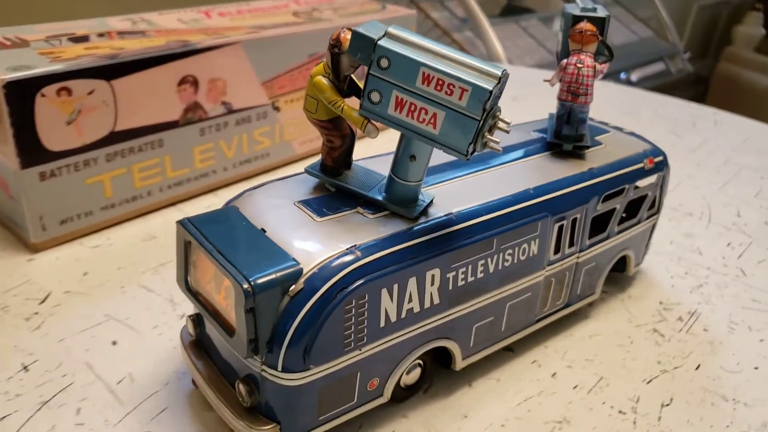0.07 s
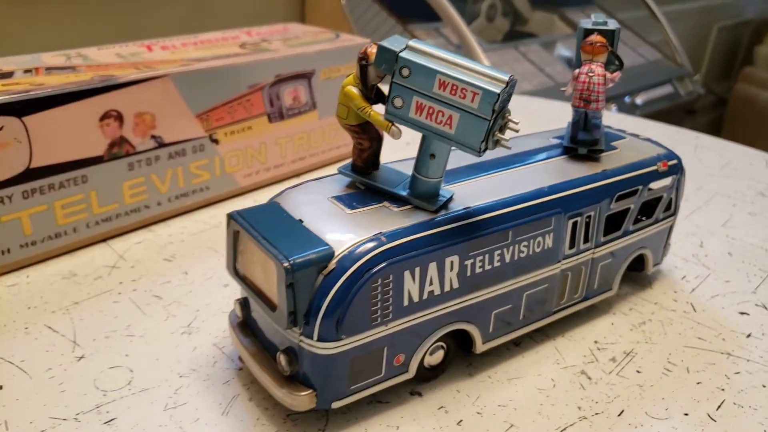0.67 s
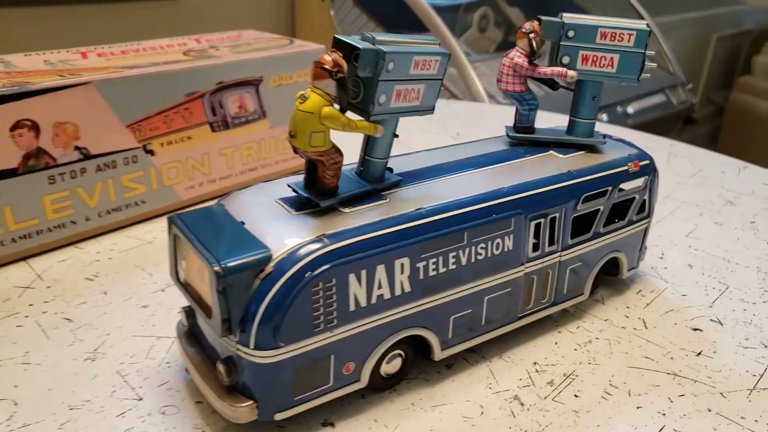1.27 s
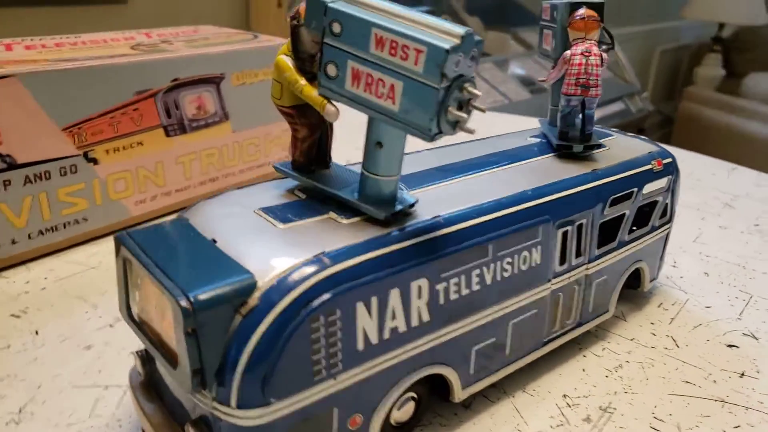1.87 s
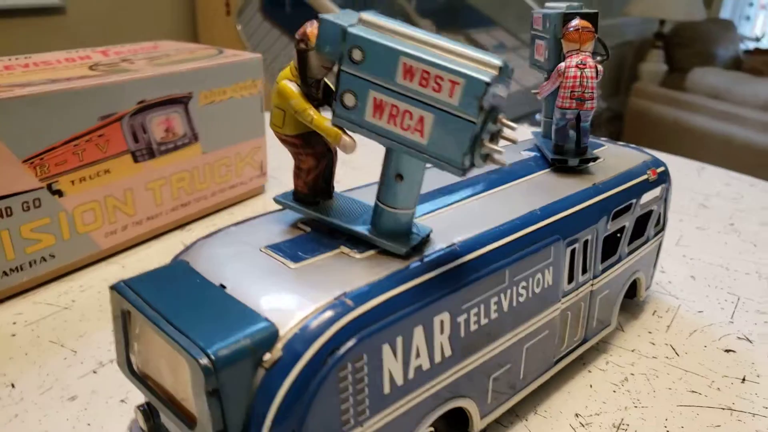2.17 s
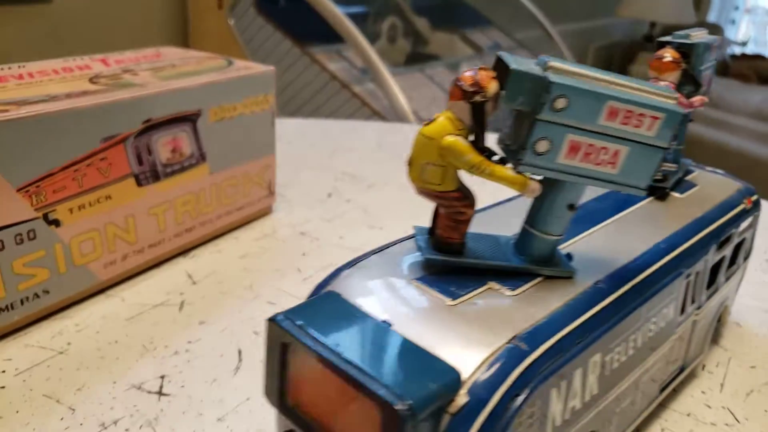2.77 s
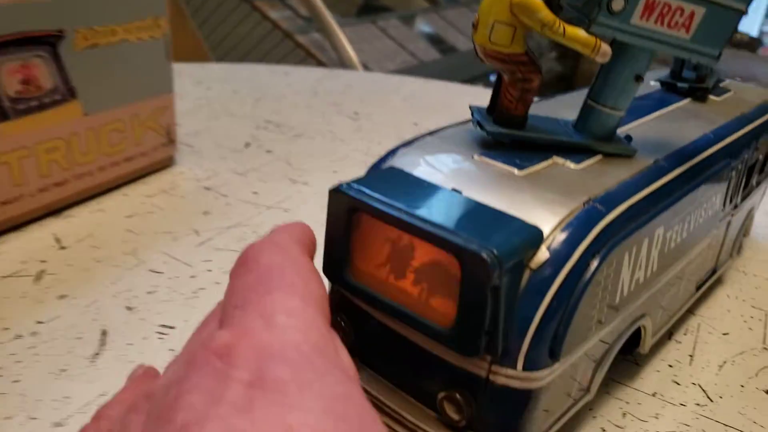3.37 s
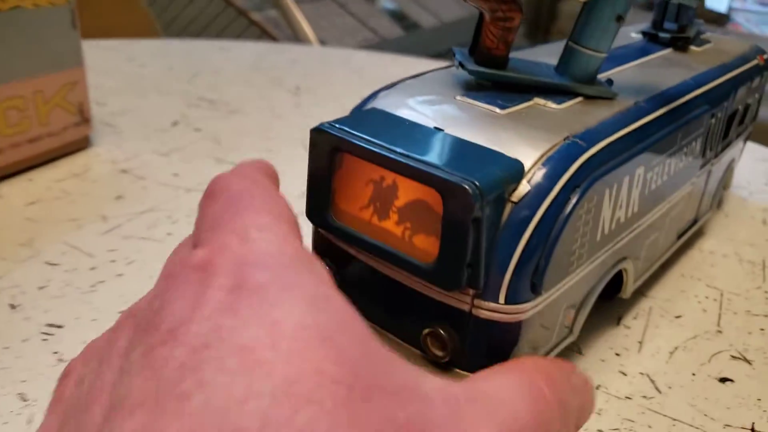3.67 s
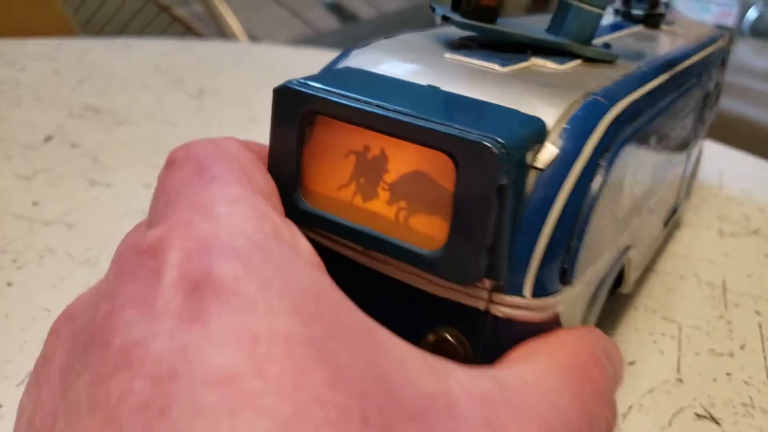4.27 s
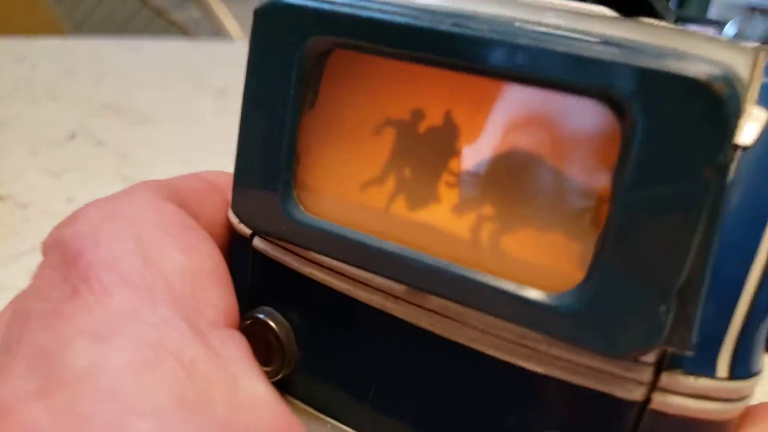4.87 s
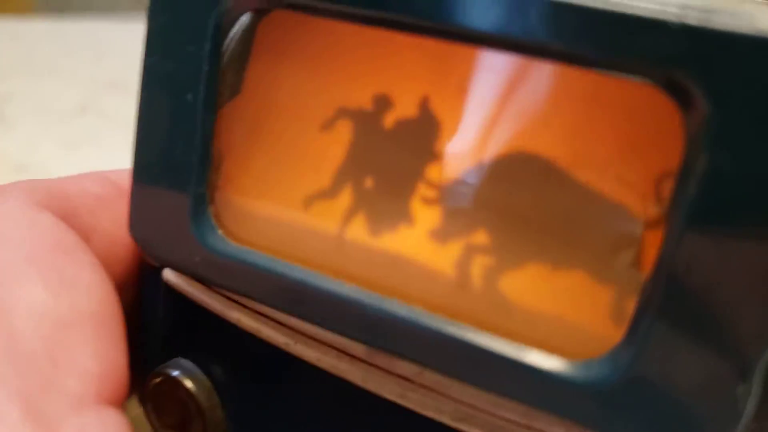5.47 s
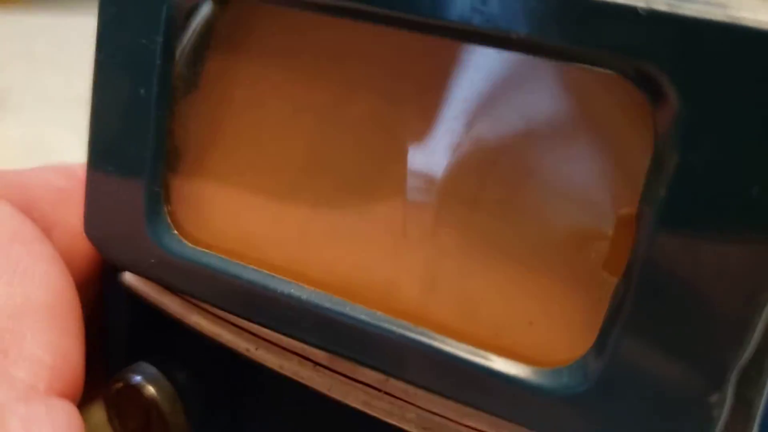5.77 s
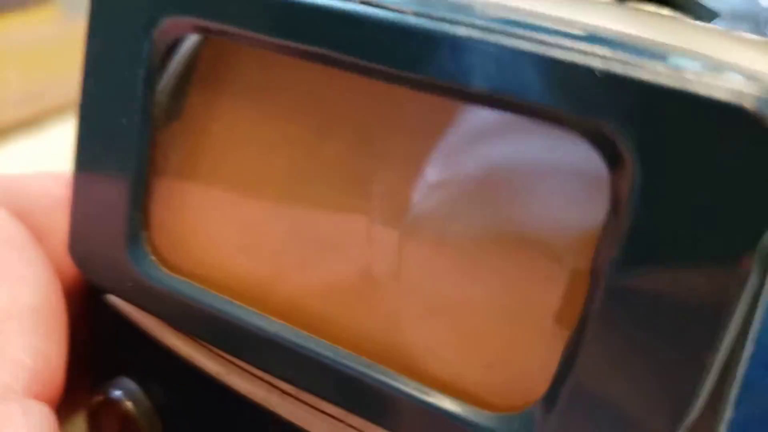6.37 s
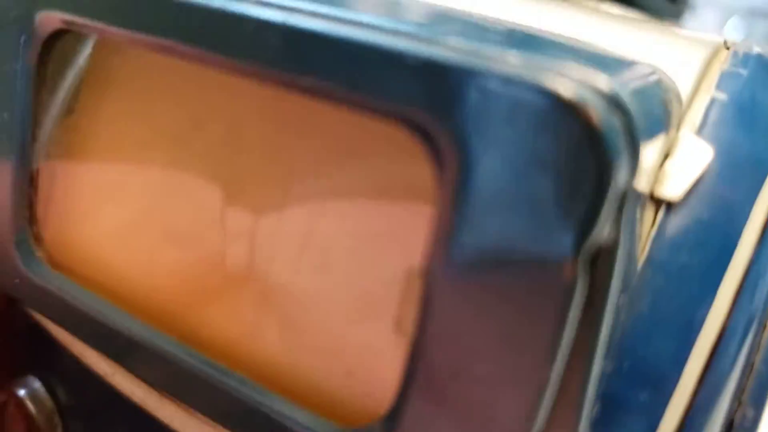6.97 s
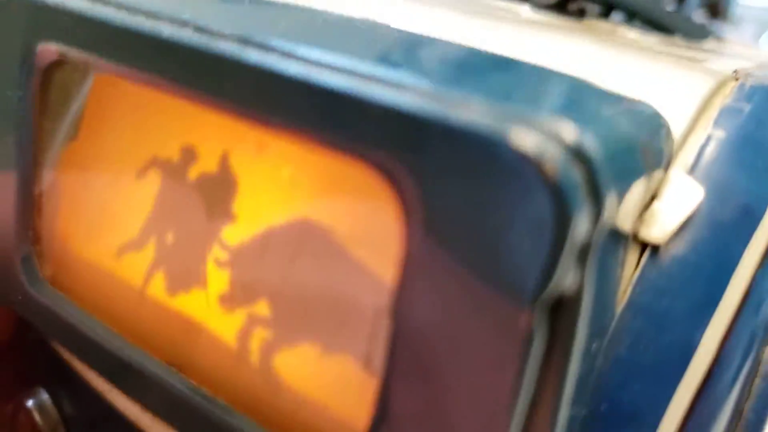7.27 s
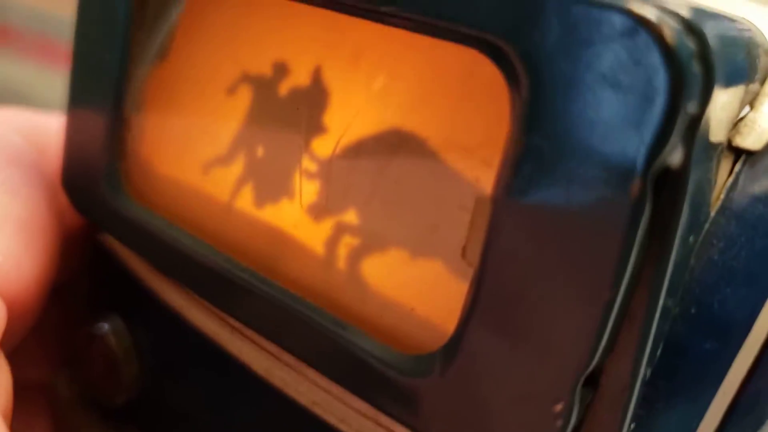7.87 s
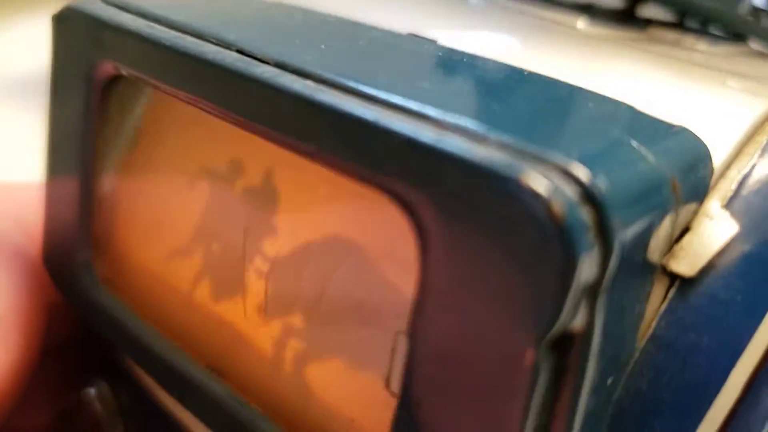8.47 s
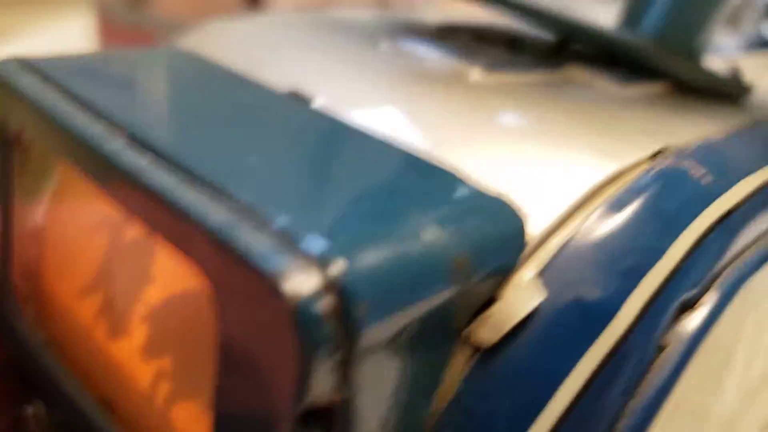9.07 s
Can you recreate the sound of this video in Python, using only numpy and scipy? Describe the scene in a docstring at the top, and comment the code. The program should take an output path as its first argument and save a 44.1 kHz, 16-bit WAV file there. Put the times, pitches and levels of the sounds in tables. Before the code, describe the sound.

A battery-powered tin toy truck whirs on a table in a small room, its motor and loose gears making a dense, bright metallic rattle for the whole nine seconds. The gears take up a load from about 1 to 2.3 seconds, 4.7 to 6.2, and again from 8.6: the motor sags slightly, the rattle throbs and the panels ring. Underneath, the wheels drum on the table, with dull knocks around 1.7 and 2.5 seconds, easing when a hand takes hold just after 4. The microphone moves from the side to close in front by 5 seconds, and the rattle grows slightly louder. Loose parts clack near 2, 2.5, 5, 6, 7.5, 8 and 9 seconds. A tiny, very high bearing squeak comes just before 6. Thin whistles come and go from then until 8.7, and the toy slides with a soft judder from 6.2 to 7.7.

```python
"""A whirring tin rattle: a toy truck's battery motor turns loose gears that shake its sheet-metal body.
Every few seconds the gears run slack, then take up a load: the motor sags, the rattle throbs, panels sing.
The wheels drum on a table until a hand takes hold, then slides the toy.
Loose parts clack, thin high whistles come and go, a dry bearing squeaks.
A stereo microphone moves from beside the truck to close in front, in a small room."""
import sys
import numpy as np
from scipy import signal
from scipy.fft import rfft, irfft, next_fast_len
from scipy.io import wavfile
from scipy.ndimage import uniform_filter1d

SR = 44100
rng = np.random.default_rng(int(sys.argv[2]) if len(sys.argv) > 2 else 0)


def dump(signal):
    """Clip the signal to [-1, 1] and save it as 16-bit WAV at the path in sys.argv[1]."""
    limited = np.clip(np.atleast_2d(signal).T, -1, 1)
    pcm = np.round(limited * 32767).astype(np.int16)
    wavfile.write(sys.argv[1], SR, pcm)


N = 406602
TIME = np.arange(N) / SR
FFT_SIZE = next_fast_len(N, True)
FREQS = np.fft.rfftfreq(FFT_SIZE, 1 / SR)


def amp(db):
    return 10 ** (np.asarray(db) / 20)


def unit_rms(x):
    return x / np.sqrt(np.mean(x ** 2) + 1e-20)


def over_time(rows, column=1):
    """Time-table column at every sample."""
    rows = np.array(rows)
    return np.interp(TIME, rows[:, 0], rows[:, column])


def over_hz(rows, hz, column=1):
    """Spectrum-table column, interpolated in log frequency."""
    rows = np.array(rows)
    return np.interp(np.log(hz + 1), np.log(rows[:, 0] + 1), rows[:, column])


def colour(x, gain):
    """Filter by a gain given at FREQS."""
    return irfft(rfft(x, FFT_SIZE) * gain, FFT_SIZE)[..., :N]


def bell(hz, width_hz):
    """Response of one resonance."""
    return 1 / (1 + (2 * (FREQS - hz) / width_hz) ** 2)


def wander(rate_hz):
    """Low-passed noise, rms 1."""
    return unit_rms(colour(rng.standard_normal(N), bell(0, 2 * rate_hz)))


def ramp(at_s, edge_s):
    """Rise from 0 to 1, centred on at_s."""
    return np.clip((TIME - at_s) / edge_s + .5, 0, 1)


def arch(start_s, end_s):
    """Sample span, progress through it, and a rounded swell."""
    span = slice(*np.searchsorted(TIME, [start_s, end_s]))
    progress = (TIME[span] - start_s) / (end_s - start_s)
    return span, progress, np.sqrt(abs(np.sin(np.pi * progress)))


def balance(left_minus_right_db):
    return amp(np.array([[.5], [-.5]]) * left_minus_right_db)


def add(mix, at_s, sound):
    part = mix[..., round(at_s * SR):][..., :sound.shape[-1]]
    part += sound[..., :part.shape[-1]]


def resonate(x, hz, width_hz):
    """Unity-gain resonance following the curve hz."""
    phasor = np.exp(2j * np.pi * np.cumsum(hz) / SR)
    pole = np.exp(-np.pi * width_hz / SR)
    return 2 * (phasor * signal.lfilter([1 - pole], [1, -pole], x / phasor)).real


# Spells under load (start [s], end [s], slack before [s], lift [dB], throb [Hz])
LOAD_SPELLS = [(.96, 2.25, .18, 2, 8.6), (4.719, 6.2, 0.89, 2, 7.4), (8.6, 9.4, 0.4, 1, 7.25)]
# Gears catching (middle [s], length [s], lift [dB])
GEAR_CATCHES = [(0.472, 0.055, 1.5), (0.614, 0.25, 1.8), (0.99, 0.055, 0), (1.2, 0.073, 1.5),
                (1.615, 0.16, 1.5), (1.82, 0.25, 1.8), (2.105, 0.35, 0.5), (2.516, 0.13, 3),
                (2.88, 0.088, 1.6), (3.436, 0.087, 2), (3.582, 0.15, 2.5), (5.264, 0.12, 1.5),
                (5.56, 0.27, 2.5), (5.89, 0.34, 0.3), (6.28, 0.051, 4), (8.681, 0.068, 1.5)]


def gear_load(engage_s=.05, first_crest_s=.12, throb_db=.86, free_throb_db=.19, free_throb_hz=7.6):
    """Gears slacken, engage and catch: load and slack (0 to 1), and the rattle's lift."""
    load, slack, effort_db = np.zeros((3, N))
    for start, end, slack_s, lift_db, throb_hz in LOAD_SPELLS:
        engaged = ramp(start, engage_s) - ramp(end, engage_s)
        throb = np.cos(2 * np.pi * throb_hz * (TIME - start - first_crest_s))
        load += engaged
        slack += ramp(start - slack_s, engage_s) - ramp(start, engage_s)
        effort_db += engaged * (lift_db + throb_db * throb)
    effort_db += (1 - load) * free_throb_db * np.cos(2 * np.pi * free_throb_hz * (TIME - 6.5))
    for middle_s, length_s, lift_db in GEAR_CATCHES:
        effort_db += lift_db * np.cos(np.pi * np.clip((TIME - middle_s) / length_s, -.5, .5))
    return load, slack, effort_db


def tin_ring(ring_t60_s=.023, room_t60_s=.31, room_db=-21):
    """Two paths from one contact: dense sheet-metal ring, then the room; spectrum flattened."""
    t = np.arange(SR // 5) / SR
    decay = amp(-60 * t / ring_t60_s) + amp(room_db - 60 * t / room_t60_s)
    spectrum = rfft(rng.standard_normal((2, len(t))) * decay)
    return irfft(spectrum / np.sqrt(uniform_filter1d(abs(spectrum) ** 2, size=24, axis=1)))


def gears(turns, contacts=5, teeth=12, uneven_db=5.2, flutter_db=2, timbre_db=9, creep_hz=.9):
    """Teeth strike early or late at loose contacts, each creeping between two ringing spots."""
    out, clumps_db = np.zeros((2, N)), -.06 * wander(30)
    # Contacts share out the spectrum and, in slowly shifting parts, the load.
    ripple = FREQS / rng.uniform(1660, 8200, (contacts, 1)) + rng.random((contacts, 1))
    timbres = amp(timbre_db * np.sin(2 * np.pi * ripple))
    timbres /= np.linalg.norm(timbres, axis=0)
    shares = amp(1.07 * np.array([wander(2.8) for _ in range(contacts)]))
    shares /= np.linalg.norm(shares, axis=0)
    for k in range(contacts):
        teeth_passed = teeth * turns / (1 + k / 3) + .25 * wander(500)
        strikes = np.diff(np.floor(teeth_passed), prepend=0) > 0
        eccentric_db = .85 * np.sin(2 * np.pi * (turns / (1 + k) + rng.random()))
        force_db = uneven_db * np.minimum(rng.standard_normal(N), 2) + flutter_db * wander(40)
        blows = unit_rms(strikes * amp(force_db + eccentric_db + clumps_db)) * shares[k]
        chance = rng.uniform(-1, 1, N)
        creep = np.sin(2 * np.pi * (creep_hz * (.5 + rng.random()) * TIME + rng.random()))
        for spot in chance < creep, chance >= creep:
            out += signal.oaconvolve(colour(blows * spot, timbres[k])[None], tin_ring(), axes=1)[:, :N]
    return unit_rms(out)


def motor_buzz(turns, drift_db=3):
    """The same roughness passes every shaft turn: a wavering stack of harmonics."""
    grid, orders = np.linspace(0, 1, 2048), np.arange(7, 108)[:, None]
    shapes = [np.cos(2 * np.pi * (orders * grid + rng.random(orders.shape))).sum(0) for _ in range(2)]
    buzz = [np.interp(turns % 1, grid, shape) * amp(drift_db * wander(2.6)) for shape in shapes]
    return unit_rms(np.array(buzz))


# Left-right likeness (frequency [Hz], correlation [-1 to 1])
MIC_CORRELATION = [(100, 0.72), (700, 0.84), (1200, 0.79), (2000, 0.086), (3500, 0.011), (15000, 0.016)]


def mic_pair(x, lag_s=.0001):
    """Two unrelated signals blend at the microphone ports; the right one lags."""
    angle = np.arccos(np.clip(over_hz(MIC_CORRELATION, FREQS), -1, 1)) / 2
    mid, side = colour(x[0], np.cos(angle)), colour(x[1], np.sin(angle))
    return np.array([mid + side, colour(mid - side, np.exp(-2j * np.pi * FREQS * lag_s))])


def table_echo(x, echo_db=-11, delay_s=.0019, drift_s=.00009):
    """The table mirrors the treble; the notches slide as the hand-held microphone drifts."""
    treble = colour(x, 1 - bell(0, 7900))
    paths = [np.interp(TIME - delay_s - drift_s * colour(wander(.49), bell(0, 2.6)), TIME, port)
             for port in treble]
    return (x + amp(echo_db) * np.array(paths)) / np.sqrt(1 + amp(echo_db) ** 2)


# Microphone path (time [s], position [0 side, 1 front])
MIC_PATH = [(0, 0.32), (3.3, 0.32), (4.4, 0.57), (4.9, 0.88), (6.3, 0.93), (9.2, 0.79)]
# Microphone sway (time [s], left minus right [dB])
MIC_SWAY = [(0, -4), (2.7, -2.5), (3.4, -4), (4.7, -1.2), (6.7, 0), (8.2, -2.5), (9.2, 0)]
# Broad body radiation (frequency [Hz], side [dB], front [dB])
RADIATION = [(60, -55, -73), (386, -19, -11), (584, -14.5, -15.5), (823, -25.5, -12.5), (890, -3.5, -11.5),
             (1600, -12, -6.5), (2380, -4.5, -3), (3380, -1.5, 1), (5300, -4, -1.5), (6520, -4, -6),
             (10080, -11, -12), (11520, -3.5, -5.5), (14100, -4, -6), (15500, -4, -1)]
# Panel resonances and gaps (frequency [Hz], width [Hz], side lift [dB], front lift [dB])
PANEL_MODES = [(708, 120, 19.5, 3), (978, 69, 8, 5), (1120, 38, 10.5, 1), (1260, 89, 11.5, 4),
               (1397, 107, 6, 5.5), (1470, 66, 7, 3.5), (1620, 120, 8, 0.5), (1923, 160, 10, 5.5),
               (2180, 220, 3.5, -2.5), (2390, 110, 6, -1.5), (2604, 190, 2.5, 3), (2780, 120, -3, -0.5),
               (3070, 73, 3, 5), (3330, 94, 5, -5), (3460, 120, 0, 2.5), (4050, 280, 0.5, -1.5),
               (4760, 200, 1, 4), (5110, 120, -2, 6.5), (5650, 300, -1, 1.5), (6100, 220, -0.5, -1),
               (6340, 230, 1.5, 1), (6770, 280, 4, -2.5), (7500, 130, 5, -0.5), (7600, 2200, -6.5, -0.5),
               (7960, 190, 5, 6), (8270, 740, 4.5, 3), (8900, 300, -6, 3), (9280, 220, 3, 1),
               (10790, 200, 0, 5), (10950, 210, 6.5, 7.5), (12100, 420, 0, 3), (15500, 300, 4, -3)]
# Body's left minus right (frequency [Hz], side [dB], front [dB])
BODY_BALANCE = [(503, 11, 3), (805, 5, -5), (1280, 8, -5.5), (1425, 8, 6), (1920, -2.5, 9),
                (2390, 7.5, 3.5), (2900, 5, 10.5), (4200, 2, 0.5), (5270, 3.5, 6), (5800, 7, -1),
                (7340, 11, 16.5), (8200, 5, -2), (12500, 4.5, 2), (15500, 6, -4)]
# Ring, clatter, rasp, sizzle, fizz
# (upper edge [Hz], side gain [dB], front gain [dB], load change [dB], slack change [dB])
BODY_BANDS = [(2285, -10.5, -10, -1.1, -0.84), (5340, -8.5, -9, 1, -1.26), (7380, -11, -17.5, 1, -3.5),
              (12440, -6, -5, -0.95, -0.64), (20200, -7.5, -5, 1.3, 0.5)]


def tin_body(drive, load, slack, front, shiver_db=.78):
    """Panels colour the rattle by listening angle; load and slack shift the tone."""
    out = np.zeros((2, N))
    lowpasses = [1 / (1 + (FREQS / edge_hz) ** 12) for edge_hz, *_ in BODY_BANDS]
    bands = np.diff(lowpasses, axis=0, prepend=0)
    for view, share in enumerate([1 - front, front]):
        panels_db = sum(lift_db[view] * bell(hz, width) for hz, width, *lift_db in PANEL_MODES)
        shell_db = over_hz(RADIATION, FREQS, view + 1)
        gain = amp(shell_db + panels_db) * balance(over_hz(BODY_BALANCE, FREQS, view + 1))
        for band, (_, *view_db, load_db, slack_db) in zip(bands, BODY_BANDS):
            tone_db = view_db[view] + load_db * load + slack_db * slack + shiver_db * wander(19)
            out += share * unit_rms(colour(drive, gain * band)) * amp(tone_db)
    return swelling_bands(shimmer(out), load, front) * balance(over_time(MIC_SWAY))


# Narrow-mode fluctuation (frequency [Hz], rms depth [dB])
SHIMMER_DEPTH = [(900, 0.8), (2600, 2.3), (9000, 2.6), (12000, 2)]


def shimmer(x):
    """Countless narrow modes of thin tin come and go."""
    hz, _, spectra = signal.stft(x, SR, nperseg=2048)
    modes = rng.standard_normal(spectra.shape)
    for _ in range(2):
        modes = uniform_filter1d(uniform_filter1d(modes, size=3, axis=1), size=8, axis=2)
    depth_db = over_hz(SHIMMER_DEPTH, hz)[:, None]
    excess_power_db = depth_db ** 2 * np.log(10) / 20
    return signal.istft(spectra * amp(depth_db * unit_rms(modes) - excess_power_db), SR)[1][:, :N]


# Panels under load (frequency [Hz], width [Hz], side lift [dB], front lift [dB])
STRAINED_MODES = [(935, 120, 6.5, 0), (1090, 77, 0.5, 3.5), (1710, 100, 4, 2), (3140, 100, 5.5, -2),
                  (3600, 240, 2.5, -0.5), (4380, 270, 0.5, 2)]
# Passing bands (start [s], end [s], from [Hz], to [Hz], width [Hz], left lift [dB], right lift [dB])
GLIDING_BANDS = [(0, .8, 10980, 11030, 130, 7, 3), (0, .6, 3200, 3130, 90, 3, 8),
                 (.45, 0.86, 6900, 6800, 300, 6, 2), (.97, 1.2, 3135, 3100, 60, 6, 7.5),
                 (1, 1.5, 3300, 3310, 50, 7, 6), (1.05, 1.32, 995, 985, 70, 6, 8),
                 (1.5, 2.4, 11100, 11200, 200, 6, 6), (1.7, 2.1, 3290, 3360, 60, 6, 6),
                 (2.6, 3.4, 6850, 6700, 300, 6.5, 0), (3.4, 3.5, 6800, 6650, 300, 6, 5),
                 (3.1, 4.7, 1240, 1290, 200, 3.5, 2.5), (4.4, 7.3, 1100, 1150, 110, 9.5, 7),
                 (6.3, 9.8, 1905, 1968, 60, 6, 6.5), (4.6, 5.9, 3470, 3470, 80, 5, 1.5),
                 (4.7, 5.3, 10950, 10920, 220, 6, 6), (4.8, 5.3, 5180, 5220, 80, 4, -2),
                 (5.2, 5.5, 1060, 1027, 87, 5.5, 5.5), (5.3, 6.1, 4700, 4600, 100, 2, 1),
                 (5.47, 5.8, 1390, 1400, 1107, 1.5, 4), (5.4, 6, 7550, 7850, 260, 6, -6),
                 (5.65, 6.2, 10900, 10720, 250, 6, 3), (6.25, 6.6, 8930, 8800, 130, -1, 7),
                 (6.8, 7.6, 8740, 8450, 99, 3, 6), (7.1, 7, 975, 970, 90, 5, 7),
                 (7.9, 8, 8200, 8400, 201, 2, 10), (7.3, 9.2, 15350, 15550, 300, 1.5, 6),
                 (7, 11, 780, 780, 160, 5, 5), (8.499, 9.7, 2665, 2676, 100, 6, 8),
                 (8.62, 9.4, 970, 980, 80, 4.5, 5), (6.25, 7.05, 980, 970, 260, -3.5, -3.5),
                 (8.55, 9.4, 1930, 1950, 170, 3, 3), (0, .75, 985, 980, 90, 3, 3)]


def swelling_bands(x, load, front, flutter_db=1.5):
    """Narrow bands of the rattle swell or dull, some with load, others gliding."""
    out, flutter = x.copy(), amp(flutter_db * wander(90))
    for hz, width_hz, side_db, front_db in STRAINED_MODES:
        lift = load * (amp(side_db + (front_db - side_db) * front) - 1)
        out += lift * flutter * signal.lfilter(*signal.iirpeak(hz, hz / width_hz, SR), x)
    for start, end, from_hz, to_hz, width_hz, left_db, right_db in GLIDING_BANDS:
        span, progress, swell = arch(start, end)
        lift = swell * (amp([[left_db], [right_db]]) - 1)
        hz = from_hz + (to_hz - from_hz) * progress
        out[:, span] += lift * flutter[span] * resonate(x[:, span], hz, width_hz)
    return out


# Rotor harmonics (order [x shaft speed], side [dB], front [dB], load change [dB])
HUM_HARMONICS = [(1, -80, -77.5, 3.5), (3, -68, -66.5, 2), (5, -67.5, -70.5, 2.5)]


def motor_hum(turns, load, front, waver_db=3, jitter_cycles=.042):
    """Low, rough hum of the unbalanced rotor."""
    out = np.zeros(N)
    for order, side_db, front_db, load_db in HUM_HARMONICS:
        db = side_db + (front_db - side_db) * front + load_db * load + waver_db * wander(11)
        out += amp(db) * np.sin(2 * np.pi * (order * turns + jitter_cycles * wander(33)))
    return np.sqrt(2) * out


# Wheel drumming spectrum (frequency [Hz], relative level [dB])
DRUM_SPECTRUM = [(30, -25), (90, -6), (170, -3), (236, 6.5), (300, 6), (450, 0), (600, -5), (900, -8),
                 (2000, -49)]
# Chassis pressing on the table (start [s], release [s], boom level [dB])
CHASSIS_PRESSES = [(0.09, 0.62, -66), (0.955, 1.54, -62), (1.66, 1.72, -46), (1.79, 1.837, -48.5),
                   (2.181, 2.4, -58), (2.56, 3.76, -54), (3.76, 3.988, -50), (4.816, 5, -74),
                   (6.1, 6.387, -65.5), (6.401, 7.02, -63), (7.05, 7.45, -79)]


def wheels_on_table(load, grip_s=4.2, boom_hz=110, fade_db_per_s=132):
    """Wheels shake the table: drumming, a booming mode, deep rumble. A hand takes the weight off."""
    held = ramp(grip_s, .15)
    presses = [amp(db - fade_db_per_s * np.maximum(TIME - release, 0)) * ramp(start, .04)
               for start, release, db in CHASSIS_PRESSES]
    press = (amp(-81.5) + np.max(presses, axis=0)) * amp(.7 * wander(13))
    shake = mic_pair(rng.standard_normal((2, N))) * amp(.36 * wander(30))
    rolling = np.hypot(amp(-57 - 8.5 * held + 4 * load), amp(-10) * press)
    drumming = unit_rms(colour(shake, amp(over_hz(DRUM_SPECTRUM, FREQS)))) * rolling
    phase = 2 * np.pi * (boom_hz * TIME + .11 * wander(4.2))
    mode = unit_rms(np.sin(phase)) + .61 * unit_rms(colour(shake, bell(boom_hz, 19)))
    octave_buzz = (1 - held) * amp(-7) * unit_rms(np.sin(2 * phase) * amp(4.1 * wander(26)))
    boom = (unit_rms(mode) + octave_buzz) * press
    slide_gain, judder = hand_slide(shake)
    rumble_gain = amp(-78) + amp(-76) * (1 - held) + amp(-16) * press + slide_gain
    rumble = unit_rms(colour(shake, bell(49.5, 38) ** 2)) * rumble_gain
    return drumming + boom + rumble + judder


# Chassis knocks (time [s], relative peak [dB], centre [Hz], t60 [s])
CHASSIS_BUMPS = [(0.271, -39, 226, 0.23), (1.617, -29.5, 382, 0.089), (1.686, -28.5, 215, 0.32),
                 (1.86, -26, 225, 0.19), (2.467, -31, 258, 0.24), (2.536, -30, 170, 0.49),
                 (5.569, -28, 400, 0.2), (6.275, -35, 413, 0.074)]


def chassis_bumps(gain_db=-8):
    """The chassis knocks dully on the table."""
    out, t = np.zeros(N), np.arange(SR // 4) / SR
    for at_s, db, hz, t60_s in CHASSIS_BUMPS:
        band = signal.butter(2, [hz / 2, hz * 2], "band", fs=SR, output="sos")
        knock = signal.sosfilt(band, rng.standard_normal(len(t)) * amp(-60 * t / t60_s))
        add(out, at_s, amp(db + gain_db) * knock / abs(knock).max())
    return out


# Hard single blows (time [s], relative peak [dB])
TIN_CLACKS = [(1.8624, -22), (2.011, -12), (2.471, -13), (2.575, -26), (4.7553, -19), (4.8635, -15),
              (5.055, -14), (5.95, -13), (6.275, -18), (7.434, -14), (7.976, -18), (9.032, -10.5)]


def clacks(gain_db=-4):
    """Loose parts snap against the tin."""
    out = np.zeros((2, N))
    for at_s, db in TIN_CLACKS:
        ring = tin_ring(ring_t60_s=.032)
        add(out, at_s, amp(db + gain_db) * ring / abs(ring).max())
    return out


# High tones (start [s], end [s], from [Hz], to [Hz], left [dB], right [dB])
THIN_WHISTLES = [(5.748, 6.147, 8070, 8000, -47, -50), (6.3, 6.953, 8000, 7910, -41.5, -45),
                 (6.35, 6.95, 5240, 5180, -46, -58), (7.1, 7.85, 7950, 7860, -42, -53),
                 (8.05, 8.65, 8340, 8390, -55, -45), (7.699, 8.0, 5150, 5090, -48, -50),
                 (7.4, 7.8, 14830, 14920, -55, -45)]


def thin_whistles(jitter_hz=45, flutter_db=1):
    """Thin high whistles swell, glide and fade."""
    out = np.zeros((2, N))
    detune_hz, flutter = jitter_hz * wander(70), unit_rms(amp(flutter_db * wander(45)))
    for start, end, from_hz, to_hz, left_db, right_db in THIN_WHISTLES:
        span, progress, swell = arch(start, end)
        phase = 2 * np.pi * np.cumsum(from_hz + (to_hz - from_hz) * progress + detune_hz[span]) / SR
        tone = np.sqrt(2) * np.array([np.sin(phase), np.cos(phase)])
        out[:, span] += amp([[left_db], [right_db]]) * swell * flutter[span] * tone
    return out


# Bearing squeal (time [s], pitch [Hz], level [dB])
SQUEAK_GLIDE = [(5.836, 15160, -58), (5.843, 14800, -35), (5.853, 14450, -34), (5.86, 14180, -28),
                (5.876, 14150, -52)]


def bearing_squeak(jitter_hz=170):
    """A dry bearing gives a short, rough, falling squeal."""
    sounding = (TIME > SQUEAK_GLIDE[0][0]) & (TIME < SQUEAK_GLIDE[-1][0])
    hz = over_time(SQUEAK_GLIDE) + jitter_hz * wander(500.2)
    return sounding * amp(over_time(SQUEAK_GLIDE, 2)) * np.sin(2 * np.pi * np.cumsum(hz) / SR)


def hand_slide(shake, start_s=6.22, end_s=7.66, judder_hz=159):
    """A hand slides the toy: an early-peaking rumble gain, and the wheels' judder."""
    progress = np.clip((TIME - start_s) / (end_s - start_s), 0, 1)
    gain = amp(-64) * np.sin(np.pi * progress ** .46)
    judder = unit_rms(colour(shake, bell(judder_hz, 40) ** 2)) * amp(-2.5) * gain
    return gain, judder


def scene(motor_hz=151.08, sag_hz=5, drift_hz=2.5, buzz_db=-8, rattle_db=-33.5, nearer_db=2.5):
    """One shaft drives gears, buzz and hum; load slows it and hardens the rattle."""
    load, slack, effort_db = gear_load()
    front = over_time(MIC_PATH)
    shaft_hz = motor_hz - sag_hz * load + drift_hz * wander(1.2)
    turns = np.cumsum(shaft_hz * (1 + .003 * wander(25))) / SR
    drive = unit_rms(gears(turns) + amp(buzz_db) * motor_buzz(turns))
    force = amp(rattle_db + nearer_db * front + effort_db + .29 * wander(2.5))
    drive += clacks() / force  # clacks stay independent of the force
    rattle = force * tin_body(table_echo(mic_pair(drive)), load, slack, front)
    hum = motor_hum(turns, load, front)
    table = (wheels_on_table(load) + chassis_bumps()) * balance(2.6)
    return rattle + hum + table + bearing_squeak() + thin_whistles()


def record(dry, cutoff_hz=15850):
    """Steep low-pass."""
    lowpass = signal.firwin(801, cutoff_hz, window=("kaiser", 9), fs=SR)
    return signal.oaconvolve(dry, lowpass[None], "same")


dry = scene()
out = record(dry)
dump(out)
```